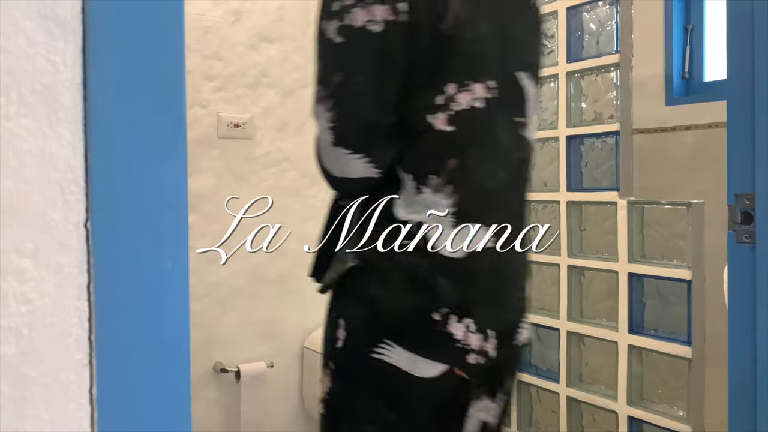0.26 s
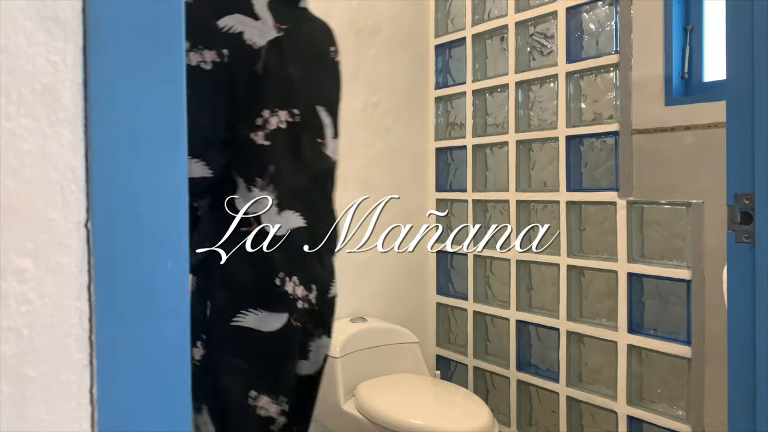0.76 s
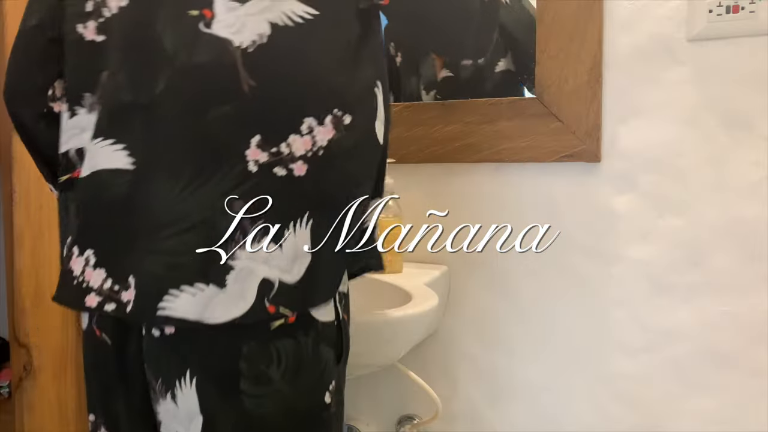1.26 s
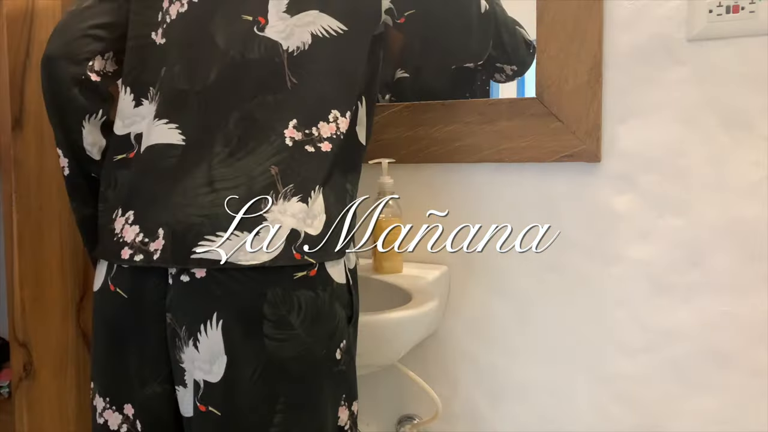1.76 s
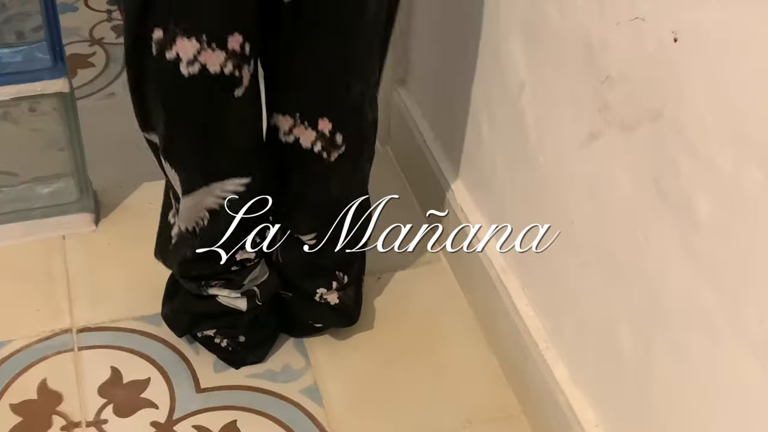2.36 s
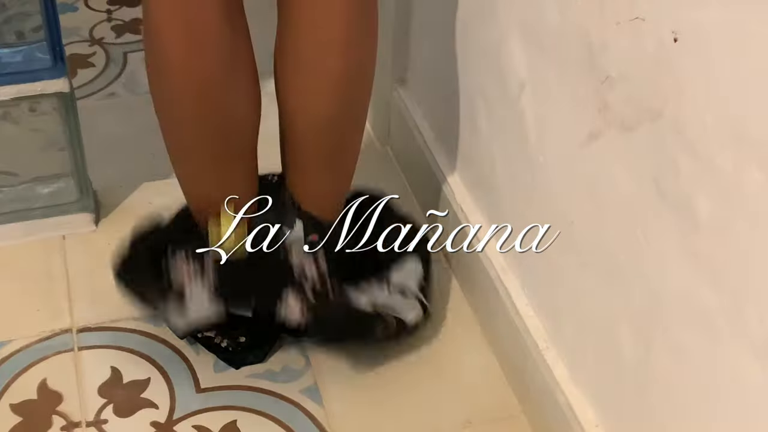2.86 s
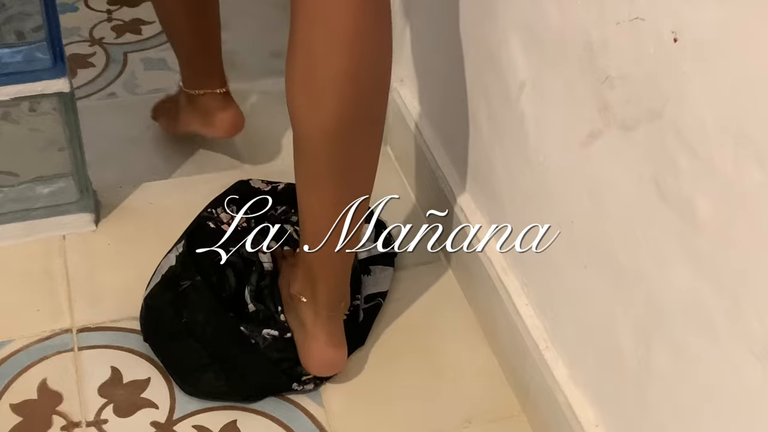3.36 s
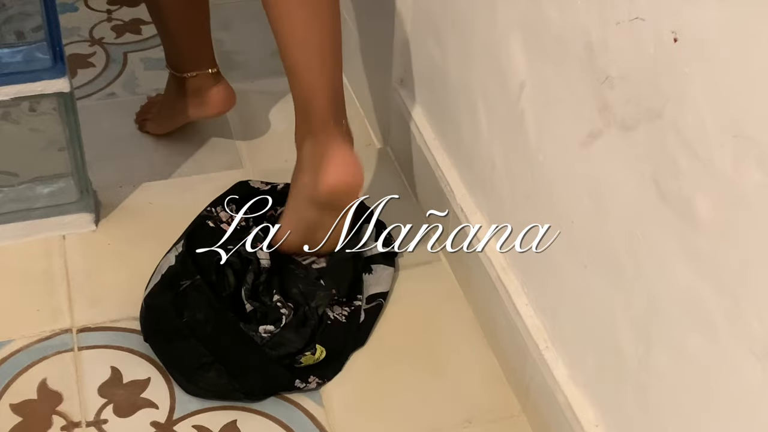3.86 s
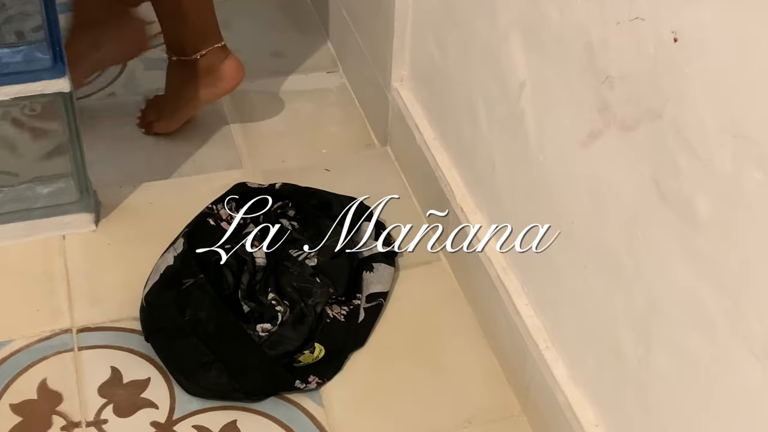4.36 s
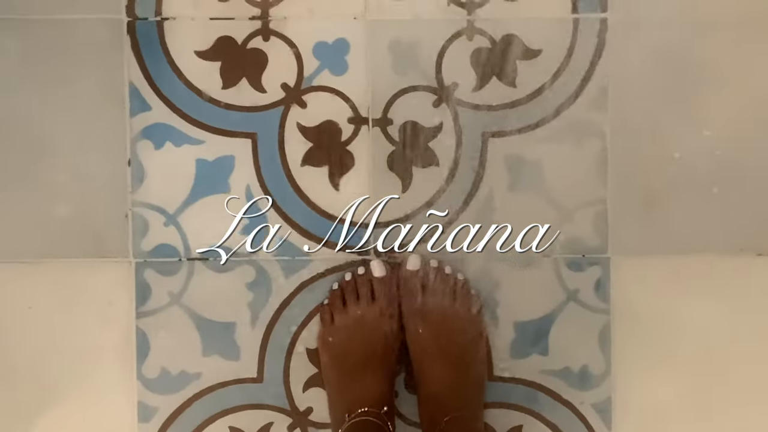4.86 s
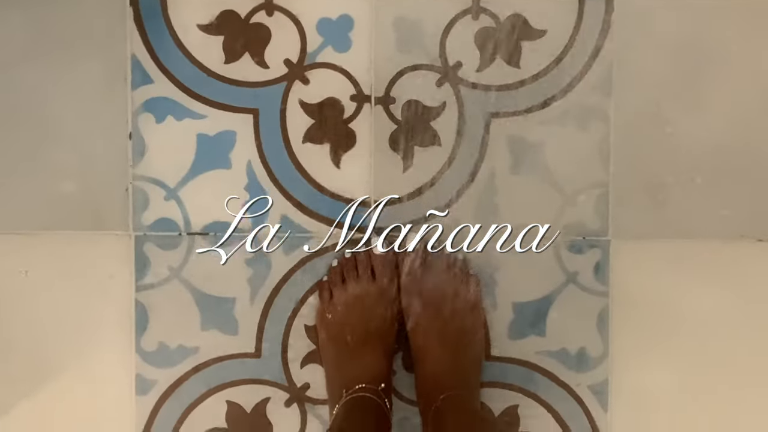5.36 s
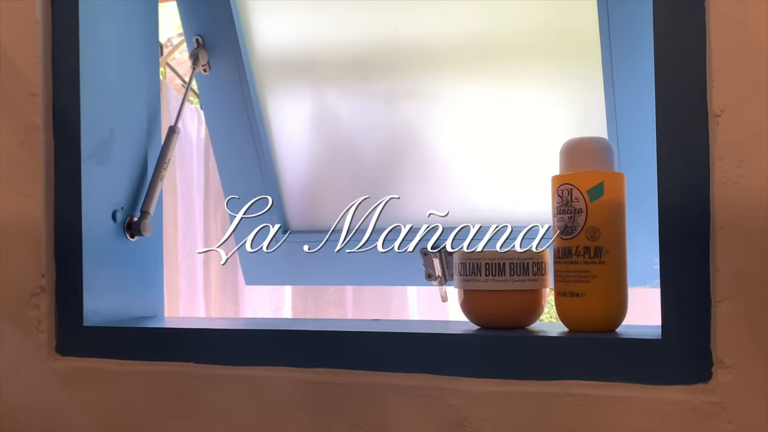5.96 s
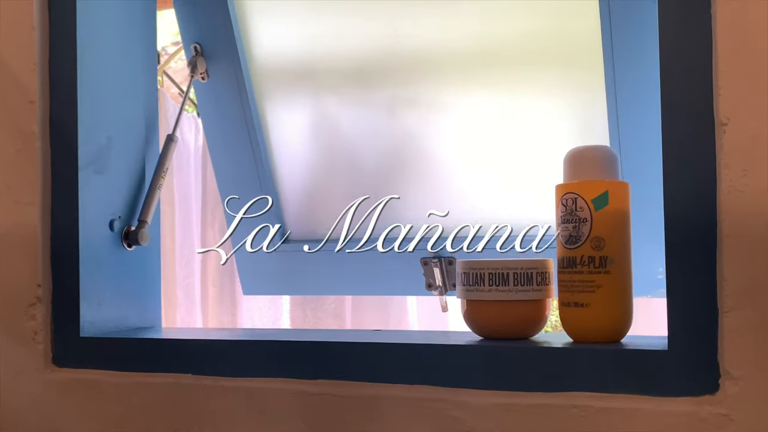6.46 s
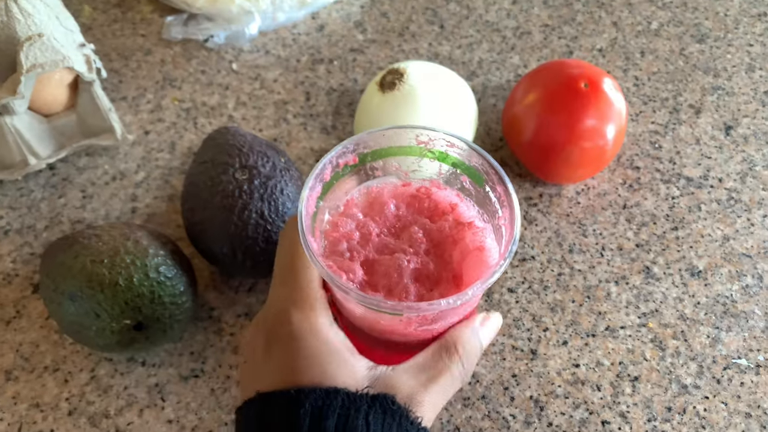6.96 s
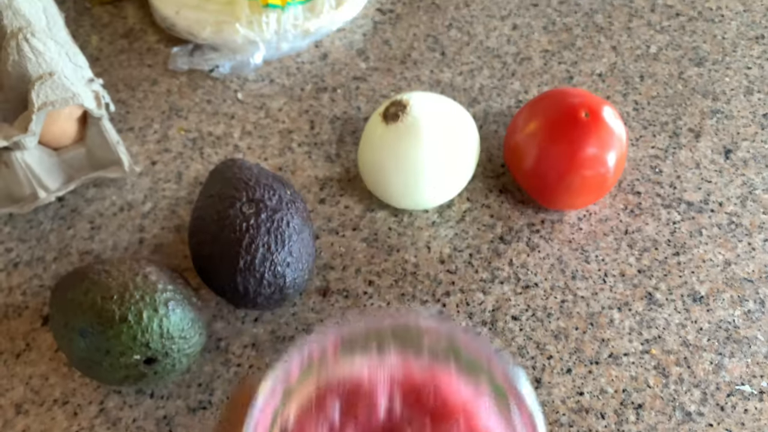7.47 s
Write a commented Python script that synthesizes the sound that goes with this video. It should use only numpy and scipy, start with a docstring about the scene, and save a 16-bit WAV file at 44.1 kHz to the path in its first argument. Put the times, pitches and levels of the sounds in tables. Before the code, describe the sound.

In a quiet tiled bathroom, two short rattling knocks with cloth scuffs ring out among soft barefoot thuds and faint birdlike chirps. A shower abruptly runs, blurred and echoing from outside the stall, then cuts to close under the spray with ticking drops and heavier splats. Finally a kitchen appliance drones while things are softly bumped and crinkled. Handheld stereo microphone.

```python
"""A tiled bathroom, then a shower, then a kitchen, each place giving way abruptly to the next.
First two rattling knocks with short scuffs ring in the room among soft footfalls and faint chirps.
Then a shower runs: first a wash of blurred drops heard from outside the stall, with soft thuds,
then close under the spray, where single drops tick, bubbles ring and heavier splats burst.
Last comes a kitchen: an appliance drones and hums while things are bumped and crinkled."""
import sys
import numpy as np
from scipy import signal
from scipy.fft import rfft, irfft, next_fast_len
from scipy.io import wavfile
from scipy.ndimage import uniform_filter1d

SR = 44100
rng = np.random.default_rng(int(sys.argv[2]) if len(sys.argv) > 2 else 0)


def wrap_up_sound(samples):
    """Save the sound to the file named by the first command line argument, as 16-bit audio."""
    columns = np.atleast_2d(samples).T
    # keep every value between -1 and 1, then stretch to whole-number steps
    tamed = np.clip(columns, -1, 1)
    steps = np.round(tamed * 32767).astype(np.int16)
    wavfile.write(sys.argv[1], SR, steps)


N = 340329
TIME = np.arange(N) / SR
SIZE = next_fast_len(N, True)
HZ = np.fft.rfftfreq(SIZE, 1 / SR)

FAR_S, NEAR_S, KITCHEN_S = 2.029, 4.431, 6.602  # starts of the far shower, near shower and kitchen


def gain_of(db):
    """Turns decibels into a factor for the amplitude."""
    return 10 ** (np.asarray(db) / 20)


def evened(x):
    """Scales a signal to an average strength (rms) of 1."""
    return x / np.sqrt(np.mean(x ** 2) + 1e-20)


def read(points, hz):
    """Reads each column of a table at any frequency, joining the points on a log-frequency axis."""
    f, *columns = np.transpose(points)
    return [np.interp(np.log(hz + 1), np.log(f + 1), c) for c in columns]


def add(mix, s, sound):
    """Adds a sound to the mix from time s on, cut off at the end of the mix."""
    part = mix[..., max(round(s * SR), 0):][..., :sound.shape[-1]]
    part += sound[..., :part.shape[-1]]


def rise_and_fall(start, end, ramp):
    """A straight rise from 0 to 1, a hold and a fall back to 0; all in seconds."""
    return np.clip(np.minimum(TIME - start, end - TIME) / ramp, 0, 1)


def between(start, end):
    """1 between two times and 0 outside, with edges of 1 ms."""
    return rise_and_fall(start, end, ramp=.001)


def wander(rate_hz):
    """A random drift of rms 1, mostly slower than the given rate."""
    noise = rfft(rng.standard_normal(SIZE))
    return evened(irfft(noise / (1 + (HZ / rate_hz) ** 2))[:N])


def below(x, hz):
    """The part of a sound under a frequency."""
    return signal.sosfiltfilt(signal.butter(2, hz, fs=SR, output="sos"), x)


def coloured(x, spectrum, rings=(), ripple_db=0):
    """Gives x a broad spectrum, standing waves and a fine ripple of many weaker room modes; rms 1."""
    ring_db = sum(g / (1 + (2 * (HZ - f) / w) ** 2) for f, w, g in rings)
    ripple = np.tanh(evened(uniform_filter1d(rng.standard_normal(len(HZ)), size=90)))
    ripple = ripple / (1 + (ring_db / 4) ** 2)  # weaker where a standing wave stands out
    ripple = ripple * HZ / (HZ + 900) / (1 + (HZ / 8000) ** 2)  # modes blur in the treble
    db = read(spectrum, HZ)[0] + ring_db + ripple_db * ripple
    return evened(irfft(rfft(x, SIZE) * gain_of(db))[:, :N])


def patchy(x, depth_db, width_hz, length_s):
    """Lets narrow parts of the spectrum swell and sink on their own, so that the colour keeps shifting."""
    hz, t, z = signal.stft(x, SR, nperseg=512)
    across = np.fft.fftfreq(len(hz), hz[1])[:, None]
    along = np.fft.rfftfreq(len(t), t[1])
    smooth = np.exp(-(across * width_hz) ** 2 - (along * length_s) ** 2)
    shape = z.shape[-2:]
    patches = evened(np.fft.irfft2(np.fft.rfft2(rng.standard_normal(shape)) * smooth, shape))
    shifted = z * evened(gain_of(depth_db * patches))
    return signal.istft(shifted, SR, nperseg=512)[1][..., :x.shape[-1]]


def impacts(per_s, spread_db):
    """Random clicks on either side, such as single drops: many small, a few large; rms 1."""
    size = gain_of(spread_db * np.minimum(rng.exponential(1, (2, N)), 5))
    hit = rng.random((2, N)) < per_s / SR
    return evened(size * rng.choice([-1, 1], (2, N)) * hit)


def plinks(per_s, cycles, spread_db, count=160):
    """Drops that land in standing water ring tiny bubbles, at many pitches that each rise a little."""
    out = np.zeros((2, N))
    for hz in np.linspace(600, 15000, count):
        turns = hz * TIME[:int(5 * cycles * SR / hz)]
        bubble = np.sin(2 * np.pi * turns * (1 + 0.019 * turns / cycles)) * np.exp(-turns / cycles)
        bubble *= np.sqrt(hz)  # short high bubbles carry as much energy as long low ones
        for when, side, size in rng.random((int(per_s * N / SR / count), 3)):
            loudness = gain_of(-spread_db * np.log(size + 0.058))
            add(out[int(side * 2)], when * N / SR, bubble * loudness)
    return evened(out)


# how long echoes last in the tiled room: (frequency [Hz], time to fall by 60 dB [s])
TILES = [(100, 0.67), (260, 0.49), (700, 0.66), (1840, 0.47), (4850, 0.47), (12000, 0.32)]


def room(x, direct_db, wet_db):
    """Direct sound plus dense reflections off the tiles, each band dying at its own speed."""
    taps = rng.standard_normal((2, SR)) * (rng.random((2, SR)) < .15)
    hz, t, z = signal.stft(taps, SR, nperseg=256)
    fading = gain_of(-60 * t / read(TILES, hz)[0][:, None])
    tail = signal.istft(z * fading, SR, nperseg=256)[1]
    tail[:, :SR // 300] = 0  # the nearest wall answers after 3 ms
    tail /= np.linalg.norm(tail, axis=1, keepdims=True)
    echoes = signal.fftconvolve(x[None], tail, axes=1)[:, :N]
    return gain_of(direct_db) * x + gain_of(wet_db) * echoes


# broad colour of the close shower: (frequency [Hz], relative level [dB])
NEAR_COLOUR = [(60, -11.5), (130, -19.0), (330, -17.9), (460, -15.0), (900, -11.5), (1200, -7.6),
               (2000, -5.5), (2700, -1.7), (3600, -4.3), (6000, -4.3), (10000, -3.3), (12500, 0.0),
               (14300, -1.5), (15500, -5.0)]
# standing waves in the stall: (frequency [Hz], width [Hz], rise over the broad colour [dB])
NEAR_RINGS = [(157, 30, 12.2), (221.6, 32, 14.5), (322, 15, 7.7), (368, 82, 7.6), (440, 31, 9.9),
              (483, 37, 10.5), (518, 106, 8), (569, 20, 7.5), (671, 65, 11.6), (830, 130, 11.3),
              (1037, 54, 10.6), (1140, 79, 10), (1200, 85, 4), (1347, 10, 17.5), (1510, 95, 2.6),
              (1640, 38, 6.9), (1750, 70, 3.5), (1890, 78, 3.4), (2010, 28, 2.2), (2140, 32, 5.9),
              (2470, 92, 3.1), (2864, 35, 6.9), (3050, 50, 3.1), (4100, 150, 3.8), (6800, 610, 0.71)]
# drumming on feet and tiles, fine spray, and how far the spray sways (rms)
DRUMMING_DB, SPRAY_DB, SWAY_DB = -27, -27, 0.56


def near_shower():
    """Under the spray, single drops tick over the hiss and the jets land in uneven clumps."""
    patter = impacts(per_s=2500, spread_db=1.0) * gain_of(-9.0) + rng.standard_normal((2, N))
    patter += gain_of(-6) * plinks(per_s=2400, cycles=15, spread_db=1.4)
    patter += gain_of(-16) * impacts(per_s=220, spread_db=1.2)
    patter *= gain_of(.6 * wander(rate_hz=35))
    patter = patchy(patter, depth_db=1.4, width_hz=160, length_s=.04)
    wash = coloured(patter, NEAR_COLOUR, NEAR_RINGS, ripple_db=6.0)
    body = below(wash, 7300)
    drumming = gain_of(DRUMMING_DB) * (body - below(body, 52))
    spray = gain_of(SPRAY_DB + SWAY_DB * wander(rate_hz=13.0)) * (wash - body)
    return drumming + spray


# heavier splats on feet and tiles:
# (time [s], level of the droplets before their rise and decay [dB], level of the first tick [dB])
SPLATS = [(4.567, -39, -30), (4.808, -27, -29), (5.039, -25.5, -25), (5.166, -31, -21), (5.362, -32, -28),
          (5.410, -28, -28), (5.424, -26, -18.5), (5.496, -37, -24), (5.564, -28, -20), (6.198, -26, -22),
          (6.361, -27, -26), (6.397, -36, -12), (6.505, -31, -17)]
# broad colour of a splat: (frequency [Hz], relative level [dB])
SPLAT_COLOUR = [(100, -19), (500, -4), (2500, 1.5), (7000, 5), (12500, 8), (15500, 1)]


def splats():
    """Gathered water falls off the body, lands with a tick and bursts into droplets."""
    burst, t = np.zeros(N), TIME[:SR // 5]
    for s, db, tick_db in SPLATS:
        droplets = gain_of(db) * (1 - np.exp(-t / 0.0014)) * np.exp(-t / 0.023)
        tick = gain_of(tick_db) * np.exp(-t / 0.00025)
        add(burst, s, droplets + tick)
    return burst * coloured(rng.standard_normal((2, N)), SPLAT_COLOUR)


# broad colour of the shower from outside: (frequency [Hz], relative level [dB])
FAR_COLOUR = [(65, -8.0), (110, -17.5), (330, -12.7), (450, -10.5), (1200, -1.4), (2100, -2.4),
              (2700, -0.8), (3300, -4.3), (4500, -4.6), (5100, -9.3), (7000, -9.3), (11000, -9.4),
              (13000, -6.5), (15500, -14.2)]
# standing waves of the bathroom: (frequency [Hz], width [Hz], rise over the broad colour [dB])
FAR_RINGS = [(138, 70, 9), (218.4, 56, 17), (285, 10, 8.5), (399, 74, 13), (482.6, 19, 11), (514, 37, 11.5),
             (558, 27, 10), (671.4, 70, 12), (793, 38, 4.5), (851, 30, 6), (894, 27, 7.5), (995, 20, 7.5),
             (1098, 35, 10.5), (1160, 32, 9), (1184, 24, 3.5), (1308, 44, 10.5), (1420, 22, 4.5),
             (1535, 50, 4.5), (1630, 36, 7.5), (2450, 19, 13), (2630, 90, 3), (2880, 72, 6)]
FAR_DB, FAR_FADE_DB_PER_S = -34, 0.03  # level at the start, and a very slight fade


def far_shower():
    """From outside the stall the drops blur into a wash that rings in the room."""
    patter = impacts(per_s=4000, spread_db=0.0) * gain_of(-6.0) + rng.standard_normal((2, N))
    patter += gain_of(-5) * plinks(per_s=2600, cycles=16, spread_db=1.1)
    patter = patchy(patter, depth_db=.6, width_hz=160, length_s=.08)
    patter = patter * gain_of(0.29 * wander(rate_hz=17.0))
    wash = coloured(patter, FAR_COLOUR, FAR_RINGS, ripple_db=4.5)
    return gain_of(FAR_DB - FAR_FADE_DB_PER_S * (TIME - FAR_S)) * (wash - below(wash, 54))


# knocks and their bounces, before filtering and echo:
# (time [s], level [dB], lowest pitch the blow excites [Hz], highest pitch [Hz])
KNOCKS = [(0.088, -45, 597, 1520), (0.5032, -23, 1600, 4500), (0.5035, -24, 226, 647),
          (0.508, -30, 1680, 6000), (0.528, -24.5, 148, 520), (0.716, -41.5, 130, 450),
          (1.0892, -23.5, 198, 1170), (1.113, -25.5, 170, 560), (1.132, -26, 1080, 1450),
          (1.255, -43, 130, 300), (1.843, -52, 500, 980), (1.853, -39, 150, 330), (1.99, -39, 110, 850)]
# what a knock rings with: (frequency [Hz], relative level [dB], time to fall by 60 dB [s])
KNOCK_MODES = [(189, -13, 0.043), (390, -10, 0.013), (550, -11.5, 0.011), (930, -6.5, 0.016),
               (1380, -0.5, 0.0041), (2030, 8, 0.004), (2900, -12, 0.0034)]


def knocks():
    """Each blow rings its own range of the same heavily damped modes; the room draws them out."""
    out, t = np.zeros(N), TIME[:SR // 5]
    ring = sum(gain_of(db - 60 * t / t60) * np.sin(2 * np.pi * hz * t) for hz, db, t60 in KNOCK_MODES)
    for s, db, low_hz, high_hz in KNOCKS:
        blow = signal.butter(3, [low_hz, high_hz], "band", fs=SR, output="sos")
        add(out, s, gain_of(db) * signal.sosfilt(blow, ring))
    return room(out, direct_db=-2, wet_db=-1.5)


# scuffs, squeaks and swishes of cloth, before the echo; a start below 0 is already under way:
# (start [s], level [dB], time to the strongest point [s], centre of the band [Hz], width [octaves])
SCUFFS = [(-0.03, -45, 0.019, 1990, 4.3), (0.087, -56.5, 0.0048, 1090, 1.5),
          (0.118, -59.5, 0.022, 380, 0.91), (0.42, -68, 0.051, 1140, 0.045), (0.42, -63.5, 0.047, 800, 1.1),
          (0.491, -46, 0.0081, 2500, 1.2), (0.5, -32.5, 0.01, 2570, 1.66), (0.514, -36.5, 0.044, 5000, 6),
          (0.525, -41, 0.017, 7660, 0.21), (0.75, -60, 0.025, 3050, 1.2), (0.996, -58.5, 0.039, 4200, 1.6),
          (1.072, -38.5, 0.015, 3180, 1.4), (1.084, -32, 0.022, 3460, 1.26), (1.38, -66, 0.051, 400, 0.68),
          (1.494, -57.5, 0.022, 2000, 1.4), (1.825, -60.5, 0.034, 258, 0.68),
          (1.986, -55, 0.0044, 1500, 0.21)]
SLIPS_PER_S, SMOOTH_RUB_DB = 1500, -17  # tiny slips, and the smooth friction relative to them


def scuffs():
    """Short rubs: a swell of tiny slips and friction noise in one band, with a shifting colour."""
    out, t = np.zeros(N), TIME[:SR // 2]
    f = np.fft.rfftfreq(len(t), 1 / SR)
    for s, db, rise, hz, octaves in SCUFFS:
        band = np.exp(-.5 * (np.log2((f + 1) / hz) / octaves) ** 2)
        band = band / np.sqrt(1 + f / hz)  # leans towards the lower side
        slipping = rng.random(len(t)) < SLIPS_PER_S / SR
        grain = rng.standard_normal(len(t)) * (gain_of(SMOOTH_RUB_DB) + slipping)
        rub = evened(irfft(rfft(grain) * band))
        stroke = (t - min(s, 0)) / rise
        add(out, s, rub * gain_of(db) * stroke * np.exp((1 - stroke ** 2) / 2))
    wet = room(out, direct_db=-4.5, wet_db=-1.0)
    return patchy(wet, depth_db=1.4, width_hz=450, length_s=.04)


# loudness curve of the drone, before a fixed lift of 2.5 dB: (time [s], level [dB])
DRONE = [(6.62, -43.5), (6.76, -41), (6.92, -42.3), (7.098, -40), (7.26, -40.5), (7.39, -41), (7.55, -43),
         (7.7, -41)]
# broad colour of the kitchen: (frequency [Hz], relative level [dB])
KITCHEN_COLOUR = [(25, -18.3), (55, -7.9), (100, -8.9), (250, 0.0), (450, -13.2), (700, -14.6),
                  (1250, -14.7), (2000, -17.7), (4500, -18.3), (7000, -21.6), (12000, -23.2),
                  (14700, -24.2), (15500, -27.9)]
# standing waves of the kitchen: (frequency [Hz], width [Hz], rise over the broad colour [dB])
KITCHEN_RINGS = [(66.6, 43, 10.2), (159, 90, 6.8), (246, 36, 2), (344, 60, 6.8), (412, 38, 9.5),
                 (473, 44, 4.3), (586, 29, 4.9), (830, 65, 2.4), (1060, 88, 5), (1208, 64, 5.5),
                 (1340, 52, 3.6)]
# the rustle: its base level, its share of the drone's rise and fall, and its fade
RUSTLE_DB, RUSTLE_FOLLOWS, RUSTLE_FADE_DB_PER_S = -35, 1, 2


def kitchen():
    """An appliance drones in the room's low modes; a soft rustle follows it under a thin hiss."""
    air = coloured(rng.standard_normal((2, N)), KITCHEN_COLOUR, KITCHEN_RINGS, ripple_db=6.0)
    air = patchy(air, depth_db=1.5, width_hz=250, length_s=.06)
    low, body = below(air, 800), below(air, 4100)
    drone_db = np.interp(TIME, *np.transpose(DRONE))
    rise_db = drone_db - drone_db[TIME > KITCHEN_S].mean()
    fade_db = RUSTLE_FADE_DB_PER_S * np.maximum(TIME - KITCHEN_S, 0)
    rustle_db = RUSTLE_DB + RUSTLE_FOLLOWS * rise_db - fade_db
    rustle = gain_of(rustle_db + 0.58 * wander(rate_hz=38)) * (body - low)
    hiss = gain_of(-36.5 + 0.28 * rise_db + 0.22 * wander(rate_hz=3.5)) * (air - body)
    return gain_of(drone_db + 2.5) * low + rustle + hiss


# steady tones of the appliance: (frequency [Hz], level before the flutter [dB])
HUM = [(263.8, -50), (317.6, -53), (468.3, -52.5), (1200, -64)]
HUM_WAVER_HZ, HUM_FLUTTER_DB = 4, 2  # how far pitch and level stray (rms)


def hum():
    """The appliance's motor holds a few steady, slightly wavering tones."""
    out = np.zeros(N)
    for hz, db in HUM:
        turns = np.cumsum(hz + HUM_WAVER_HZ * wander(rate_hz=21.4)) / SR
        out += gain_of(db + HUM_FLUTTER_DB * wander(rate_hz=4.5)) * evened(np.sin(2 * np.pi * turns))
    return out


# bumps at the counter: (start [s], level at the strongest point [dB], time to that point [s])
BUMPS = [(7.06, -41, 0.03), (7.376, -40.5, 0.011)]
# broad colour of a bump: (frequency [Hz], relative level [dB])
BUMP_COLOUR = [(30, -25), (80, -6), (150, 2), (220, -2), (400, -20), (1200, -20), (3000, -28), (10000, -60)]


def bumps():
    """Soft, dull bumps of things handled at the counter: low noise that swells and dies away."""
    push, t = np.zeros(N), TIME[:SR // 3]
    for s, db, rise in BUMPS:
        add(push, s, gain_of(db) * t / rise * np.exp(1 - t / rise))
    return push * coloured(rng.standard_normal((1, N)), BUMP_COLOUR)


# broad colour of the crinkle: (frequency [Hz], relative level [dB])
CRINKLE_COLOUR = [(300, -20), (700, 0), (1150, 5), (2200, 1), (4000, -10), (7500, -4), (14000, -14)]
CRINKLE_DB, CRINKLE_CLUMP_DB = -49, 3  # level while held, and how much it clumps (rms)


def crinkle():
    """Fine, clumped crackle of something handled at the counter; it swells once and dies away."""
    effort = rise_and_fall(start=6.93, end=7.52, ramp=0.19)
    grains = coloured(impacts(per_s=2500, spread_db=1.5), CRINKLE_COLOUR)
    return gain_of(CRINKLE_DB + CRINKLE_CLUMP_DB * wander(rate_hz=22)) * effort * grains


# thuds through the floor, from footfalls and knocks:
# (time [s], level before the soft onset [dB], pitch [Hz], time to fall by 60 dB [s])
STEPS = [(0.257, -46, 111, 0.18), (0.292, -46.5, 75.4, 0.25), (0.531, -46.5, 83.2, 0.64),
         (0.965, -50.5, 55.5, 0.44), (1.125, -43, 77, 0.43), (1.86, -53, 74, 0.16), (2.13, -53, 69.4, 0.36),
         (2.884, -43.5, 73, 0.38), (3.149, -53, 70.6, 0.63), (3.42, -45, 66, 0.32)]


def steps():
    """A heel or a blow pushes the floor, which booms briefly at two pitches."""
    out, t = np.zeros(N), TIME[:SR // 2]
    for s, db, hz, t60 in STEPS:
        boom = np.sin(2 * np.pi * hz * t) + 0.45 * np.sin(2 * np.pi * hz * 1.7 * t)
        add(out, s, gain_of(db - 60 * t / t60) * (1 - np.exp(-t / 0.0096)) * boom)
    return out


# faint chirps, before the echo:
# (start [s], length [s], level [dB], first pitch [Hz], last pitch [Hz], buzz of the pitch, rms [Hz])
CHIRPS = [(0.873, 0.093, -70.5, 1720, 1786, 12), (1.43, 0.145, -64.5, 6000, 5480, 300)]


def chirps():
    """Two faint birdlike chirps: a nearly pure rising note and a buzzy falling one."""
    out = np.zeros(N)
    for s, length, db, start_hz, end_hz, buzz_hz in CHIRPS:
        u = np.arange(0, length, 1 / SR) / length  # 0 to 1 along the chirp
        hz = start_hz + (end_hz - start_hz) * u + buzz_hz * wander(rate_hz=550)[:len(u)]
        add(out, s, gain_of(db) * np.sqrt(np.sin(np.pi * u)) * np.sin(2 * np.pi * np.cumsum(hz) / SR))
    return room(out, direct_db=0, wet_db=-10)


# broad colour of the rumble: (frequency [Hz], relative level [dB])
RUMBLE_COLOUR = [(22, -30), (40, -2), (60, 18), (85, -8), (130, -15), (300, -45), (1000, -90)]
# level at the start of the far shower, its fade there, and the level close in
RUMBLE_FAR_DB, RUMBLE_FADE_DB_PER_S, RUMBLE_NEAR_DB = -72, 10, -68.5


def rumble():
    """A deep, uneven rumble that comes with the running water and swells once close in."""
    far = gain_of(RUMBLE_FAR_DB - RUMBLE_FADE_DB_PER_S * (TIME - FAR_S)) * between(FAR_S, NEAR_S)
    swell_db = 7.8 * rise_and_fall(start=5.1, end=5.92, ramp=.1)
    near = gain_of(RUMBLE_NEAR_DB + swell_db) * between(NEAR_S, KITCHEN_S)
    noise = coloured(rng.standard_normal((1, N)), RUMBLE_COLOUR)
    return (far + near) * gain_of(.8 * wander(rate_hz=6)) * noise


# broad colour of the empty room: (frequency [Hz], relative level [dB])
QUIET_COLOUR = [(22, -11), (66, 0.5), (130, -8.5), (300, -14.5), (700, -22.5), (2000, -28), (6000, -33.5),
                (15500, -33.5)]


def quiet():
    """The faint rumble and hiss of the empty room: coloured noise with a slightly drifting level."""
    air = coloured(rng.standard_normal((2, N)), QUIET_COLOUR)
    return gain_of(-64.0 + 0.38 * wander(rate_hz=2.1)) * air


def ports(x, table, lean):
    """Two unrelated sounds become the signals of two nearby microphone ports."""
    same, lead = read(table, HZ)
    half = gain_of(read(lean, HZ)[0] / 2)
    a, b = rfft(x, SIZE)
    right = (same * a + np.sqrt(1 - same ** 2) * b) * np.exp(1j * lead)
    return irfft(np.array([a * half, right / half]))[:, :N]


# the two microphone ports, in the open room and close in:
# (frequency [Hz], likeness of the ports [0-1], lead of the right port [radians])
ROOM_PORTS = [(100, .96, 0), (300, .9, -.1), (800, .35, -1), (2000, .12, -1), (5000, .1, -1),
              (7000, .2, .2), (8600, .6, 3.1), (10100, .78, 6.3), (11700, .94, 9.4), (13300, .85, 12.6),
              (14900, .92, 15.7)]
CLOSE_PORTS = [(100, .94, 0), (280, .9, .1), (470, .65, .6), (700, .45, 2), (1500, .15, 1.5),
               (2600, .5, 2.6), (4000, .25, 2.8), (5100, .62, 3.1), (6200, .45, 1), (7200, .8, 0),
               (9700, .98, -3.1), (12200, .85, -6.3), (14800, .95, -9.4)]
# the left port mostly hears more of the middle range: (frequency [Hz], left minus right [dB])
ROOM_LEAN = [(150, 0), (400, 1.5), (850, 4), (1600, 2), (4000, 2), (6500, 0)]
CLOSE_LEAN = [(180, 0), (320, 2), (470, 5.5), (700, -.5), (1200, -.7), (2500, 0)]


def scene():
    """Bathroom and far shower in the open room, then near shower and kitchen heard close in."""
    before = (quiet() + knocks() + scuffs() + chirps()) * between(-1, FAR_S)
    wide = before + far_shower() * between(FAR_S, NEAR_S)
    spray = (near_shower() + splats()) * between(NEAR_S, KITCHEN_S)
    in_kitchen = between(KITCHEN_S, 10)
    close = spray + kitchen() * in_kitchen + crinkle()
    bass = steps() + rumble() + bumps() + hum() * in_kitchen  # long waves reach both ports alike
    return ports(wide, ROOM_PORTS, ROOM_LEAN) + ports(close, CLOSE_PORTS, CLOSE_LEAN) + bass


def record(dry):
    """The microphone cuts the bass under 32 Hz and the recorder the treble over 14400 Hz."""
    lean = signal.sosfilt(signal.butter(4, 32, "high", fs=SR, output="sos"), dry)
    treble_cut = signal.firwin(511, 14400, window=("kaiser", 9), fs=SR)
    return signal.oaconvolve(lean, treble_cut[None], "same")


dry = scene()
out = record(dry)
wrap_up_sound(out)
```